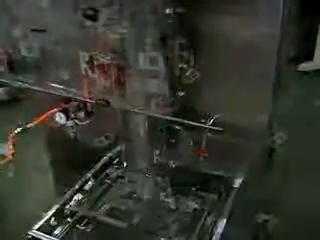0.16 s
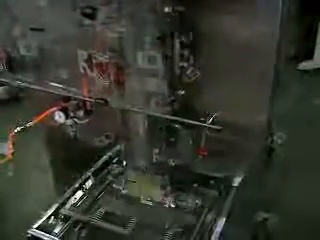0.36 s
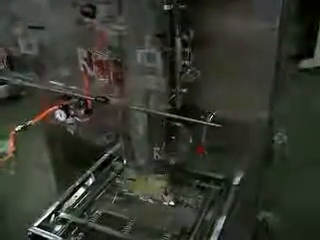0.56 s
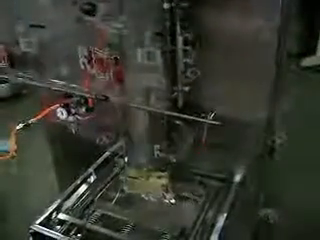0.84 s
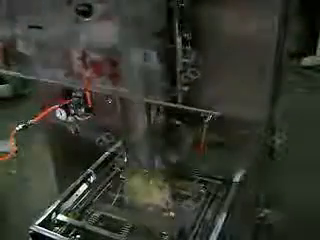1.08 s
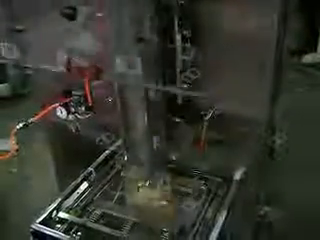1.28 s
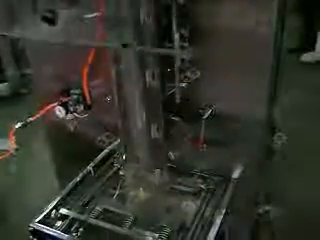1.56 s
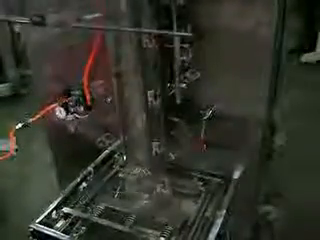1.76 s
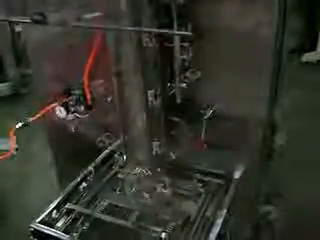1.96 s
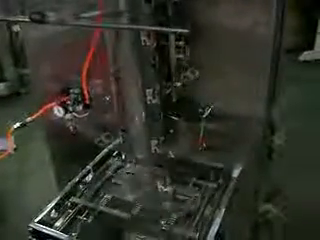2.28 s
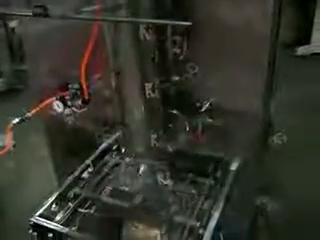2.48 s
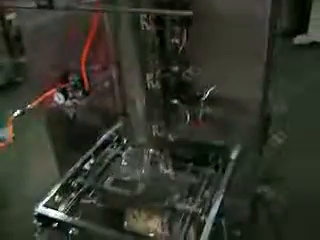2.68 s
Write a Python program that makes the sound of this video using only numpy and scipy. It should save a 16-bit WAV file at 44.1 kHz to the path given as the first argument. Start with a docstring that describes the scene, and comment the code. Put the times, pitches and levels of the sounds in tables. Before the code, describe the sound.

Close packaging machine running: whining gears, hissing bursts of compressed air, clacking valves, clattering steel slide

```python
"""The drive motor of a packaging machine whines over gear noise, in a workshop, microphone close by.
Air escapes in two bursts of filtered noise; valves and stops knock as short dying noise bursts.
For one stroke a carriage slides and rattles along its guides: random hits ring the steel frame's modes.
Mains hum and a feed motor add wavering sines. The dull microphone overloads, clipping the peaks."""
import sys
import numpy as np
from scipy import signal
from scipy.io import wavfile

SR = 44100
rng = np.random.default_rng(int(sys.argv[2]) if len(sys.argv) > 2 else 0)


def persist_wave(psi):
    """Save psi, clipped to +-1, as 16-bit WAV."""
    counts = np.round(np.clip(psi, -1, 1) * 32767).astype(np.int16)
    wavfile.write(sys.argv[1], SR, np.atleast_2d(counts).T)


N = 124803


def amp(db):
    """dB to gain."""
    return 10 ** (np.asarray(db) / 20)


def unit(x):
    """Scale to rms 1."""
    return x / np.sqrt(np.mean(x ** 2) + 1e-20)


def curve(s, values):
    """Straight lines between points in time, one value per sample."""
    return np.interp(np.arange(N) / SR, s, values)


def level(rows):
    """Gain along a (seconds, dB) curve."""
    s, db = np.transpose(rows)
    return amp(curve(s, db))


def drift(rate_hz):
    """Slow random wandering of rms 1: low-passed noise made at every 40th sample."""
    step = 40
    r = np.exp(-2 * np.pi * rate_hz * step / SR)
    noise = rng.standard_normal(N // step + 2002)
    slow = signal.lfilter([1], [1, -2 * r, r * r], noise)[2000:]  # drop the filter's start
    return np.interp(np.arange(N) / step, np.arange(len(slow)), unit(slow))


def resonance(x, hz, width_hz):
    """Two-pole resonance with gain 1 at its peak."""
    r = np.exp(-np.pi * width_hz / SR)
    feedback = [1, -2 * r * np.cos(2 * np.pi * hz / SR), r * r]
    return signal.lfilter(np.array([1, 0, -1]) * (1 - r * r) / 2, feedback, x)


def coloured(spectrum, patchy_db, rate_hz):
    """Third-octave noise bands that flicker partly together; rms 1."""
    together = drift(rate_hz)
    edges = 22 * 2 ** np.arange(0, 8.7, 1 / 3)
    white = rng.standard_normal((2, N))  # neighbouring bands take different noise
    hz, db_per_hz = np.transpose(spectrum)
    out = 0
    for k, (low, high) in enumerate(zip(edges, edges[1:])):
        db = np.interp(np.log(low * high) / 2, np.log(hz), db_per_hz)
        bandpass = signal.butter(2, [low, high], "band", fs=SR, output="sos")
        band = signal.sosfilt(bandpass, white[k % 2])
        flicker_db = patchy_db * (together + 2.5 * drift(rate_hz))
        out = out + band * amp(db + flicker_db)
    return unit(out)


def whistles(peaks):
    """Noise passed twice through each resonance."""
    out = 0
    for hz, width_hz, db in peaks:
        once = resonance(rng.standard_normal(N), hz, width_hz)
        out = out + amp(db) * unit(resonance(once, hz, width_hz))
    return out


def moving_whistle(rows, width_hz):
    """A band of noise whose centre follows a (seconds, Hz, dB) curve: slow noise on two carriers."""
    s, hz, db = np.transpose(rows)
    phase = 2 * np.pi * np.cumsum(curve(s, hz)) / SR
    lowpass = signal.butter(2, width_hz / 2, fs=SR, output="sos")
    a, b = signal.sosfilt(lowpass, rng.standard_normal((2, N)))
    return amp(curve(s, db)) * unit(a * np.cos(phase) + b * np.sin(phase))


def tone(hz, wobble_hz, flutter_db):
    """A sine of about rms 1, wavering in pitch and level."""
    flutter = amp(flutter_db * drift(20))
    pitch = hz + wobble_hz * drift(4.9)
    return np.sqrt(2) * flutter * np.sin(2 * np.pi * np.cumsum(pitch) / SR)


def gliding(rows, wobble_hz, flutter_db):
    """A tone along a (seconds, Hz, dB) curve."""
    s, hz, db = np.transpose(rows)
    return amp(curve(s, db)) * tone(curve(s, hz), wobble_hz, flutter_db)


# The drive motor's whine. Each row: time in seconds, pitch in Hz, level in dB.
DRIVE_WHINE = [(0, 935, -17), (.15, 937, -31), (.55, 942, -24.5), (.85, 944, -24), (1.0, 945, -29),
               (1.77, 945.5, -25), (1.89, 937.5, -22.5), (2.36, 940.5, -23), (2.6, 950, -31.5),
               (2.68, 938, -27), (2.74, 936, -23), (2.83, 923, -38)]


def drive_whine():
    """The turning motor gives one tone whose pitch and level follow the table, with random waver."""
    return gliding(DRIVE_WHINE, wobble_hz=3.0, flutter_db=3.5)


def chatter():
    """Gear teeth meeting unevenly: random contacts lift the gear noise in short dying bumps."""
    contacts_per_s, decay_s, depth = 200, .003, .45
    hits = (rng.random(N) < contacts_per_s / SR) * rng.random(N) * 2
    bumps = signal.lfilter([1], [1, -np.exp(-1 / (decay_s * SR))], hits)
    return unit(1 + depth * bumps)


# Strength of the gear and motor noise. Each row: time in seconds, level in dB.
GEAR_LEVEL = [(0, -13.5), (.28, -16.5), (.5, -14), (.7, -16), (.76, -17), (1.0, -17.5), (1.8, -14.5),
              (1.95, -16.5), (2.1, -16), (2.3, -15), (2.5, -12), (2.58, -17), (2.67, -20), (2.73, -15),
              (2.83, -17)]
# Colour of that noise. Each row: frequency in Hz, relative density in dB per Hz.
GEAR_COLOUR = [(25, -16), (70, -19), (120, -12), (270, -10.5), (340, -13.5), (500, -12), (640, -7),
               (950, 0.5), (1200, -3.5), (1550, -8), (2500, -12), (4700, -18), (5500, -24.5), (6500, -12.5),
               (8000, -34)]
# Casing resonances. Each row: frequency in Hz, width in Hz, level in dB relative to the coloured noise.
CASING_MODES = [(266.7, 65, -17.5), (421.8, 25, -17.5), (830.7, 22, -16.5), (175.5, 38, -22.5),
                (1153.5, 33, -12.5), (1673, 13, -20)]


def gear_noise():
    """Uneven tooth contact shakes the casing: broad noise and its resonances, chattering together."""
    noise = coloured(GEAR_COLOUR, patchy_db=.6, rate_hz=25) + whistles(CASING_MODES)
    return level(GEAR_LEVEL) * chatter() * noise


# The casing's boom coming and going with the load. Each row: time in seconds, level in dB.
CASING_BOOM = [(0, -18.5), (.25, -29.5), (.36, -47), (.48, -31), (.55, -19.5), (.72, -28), (.8, -29),
               (.9, -33), (1.0, -26.5)]


def casing_boom():
    """A broad casing resonance turns noise into a hollow boom."""
    boom_hz, width_hz = 638.4, 132
    return level(CASING_BOOM) * whistles([(boom_hz, width_hz, 0)])


# Mains hum. Each row: frequency in Hz, level in dB rms, pitch wobble in Hz.
MAINS_HUM = [(102.2, -41, 0.99)]


def mains_hum():
    """A faint, low, slightly wavering sine."""
    return sum(amp(db) * tone(hz, wobble_hz, flutter_db=0.5) for hz, db, wobble_hz in MAINS_HUM)


# The exhaust dying away. Each row: time in seconds, level in dB.
EXHAUST_LEVEL = [(0, -14), (.05, -7), (.09, -11), (.135, -7.5), (.19, -11), (.3, -13.5), (.43, -15),
                 (.47, -13.5), (.55, -17), (.6, -16), (.73, -20), (.74, -58)]
# Colour of the exhaust. Each row: frequency in Hz, relative density in dB per Hz.
EXHAUST_COLOUR = [(25, -5.5), (400, -13), (700, -21), (1300, -4), (2500, 1), (4200, -4.5), (5300, -6.5),
                  (6400, -1), (8000, -20)]
# Thin whistle as the exhaust opens. Each row: time in seconds, pitch in Hz, level in dB.
OPENING_WHISTLE = [(.01, 1352, -35), (.035, 1340, -15), (.12, 1357, -25), (.17, 1390, -56.5)]


def exhaust():
    """Turbulent escaping air: broad noise that pulses and fades, with a thin whistle at its start."""
    jet = level(EXHAUST_LEVEL) * coloured(EXHAUST_COLOUR, patchy_db=.5, rate_hz=30)
    return jet + moving_whistle(OPENING_WHISTLE, width_hz=30)


# Knocks of valves and stops. Each row: start in seconds, level in dB, ring in Hz,
# time to fall by 60 dB in seconds.
VALVE_KNOCKS = [(0.372, -7, 2360, 0.082), (.455, -14.5, 4400, 0.13), (0.488, -8.5, 4680, 0.1),
                (0.57, -5, 2780, 0.039), (1.013, -11.5, 900, 0.34), (1.191, -2.5, 2820, 0.087),
                (1.793, -8.5, 2320, 0.092), (2.682, -13, 3500, 0.083), (2.694, -15, 2498, 0.064),
                (2.779, -25, 1800, 0.014)]


def knocks():
    """Each impact is a broad dying noise burst with a ring of its own pitch."""
    ring_db, ring_width_hz, bass_cut_hz, top_cut_hz = -6, 700, 400, 6000
    bandpass = signal.butter(2, [bass_cut_hz, top_cut_hz], "band", fs=SR, output="sos")
    t, out = np.arange(N) / SR, 0
    for s, db, hz, t60 in VALVE_KNOCKS:
        noise = rng.standard_normal(N)
        broad = unit(signal.sosfilt(bandpass, noise))
        ring = unit(resonance(noise, hz, ring_width_hz))
        body = unit(broad + amp(ring_db) * ring)
        age = np.maximum(t - s, 0)
        attack = np.minimum(age / .001, 1)  # silent before the start, full after 1 ms
        out = out + amp(db - 60 * age / t60) * attack * body
    return out


# Feed motor tone, dragged down under the stroke. Each row: time in seconds, pitch in Hz, level in dB.
FEED_MOTOR = [(1.01, 411, -58), (1.14, 414.7, -14.5), (1.251, 412, -32), (1.349, 411.7, -19.5),
              (1.78, 410.6, -20.5), (1.88, 422.8, -31.5), (2.25, 425, -26.5), (2.299, 424, -33)]


def feed_motor():
    """A lower motor tone whose pitch and level follow the table."""
    return gliding(FEED_MOTOR, wobble_hz=1.5, flutter_db=1.0)


# Frame ringing under the carriage stroke. Each row: time in seconds, level in dB.
RING_LEVEL = [(1.010, -21.5), (1.0145, -6.5), (1.04, -1), (1.07, -10), (1.1, -15.5), (1.15, -9.5),
              (1.21, -17.5), (1.25, -11), (1.34, -13), (1.42, -7.5), (1.6, -11.5), (1.66, -10), (1.78, -11),
              (1.82, -15), (1.87, -18), (1.94, -30), (2.0, -50)]
# Modes of the steel frame. Each row: frequency in Hz, relative level in dB,
# time to fall by 60 dB in seconds.
FRAME_MODES = [(327, -7, .18), (356, -9, .3), (500, -3, .08), (530, -1, .1), (560, -3, .1), (590, -2, .1),
               (620, -2, .1), (712, -7, .2), (810, -6, .06), (915, -4, .1), (969, -3, .25), (1020, -8, .15),
               (1115, -5, .15), (1299, -6, .1), (1400, -8, .2), (1425, -7, .2)]
# Extra ringing of the lowest modes, growing until 1.18 s, then fading.
# Each row: time in seconds, boost in dB before the ringing is scaled as a whole.
LOW_MODE_BOOST = [(1.0, 2), (1.18, 6.5), (1.25, 1.5), (1.6, 0)]


def frame_ringing():
    """Dense uneven rattles of the carriage strike the frame, and each mode rings and decays."""
    rattles_per_s, spread_db, low_under_hz = 1100, 3.5, 450
    rate = rattles_per_s * amp(1.5 * drift(20))
    hits = (rng.random(N) < rate / SR) * rng.choice([-1, 1], N)
    hits = hits * amp(spread_db * np.minimum(rng.exponential(1, N), 5))
    boost = level(LOW_MODE_BOOST)
    rings = 0
    for hz, db, t60 in FRAME_MODES:
        width_hz = np.log(1000) / np.pi / t60
        strikes = hits * rng.standard_normal(N) + 1e-18  # each mode takes every hit differently
        ring = unit(resonance(strikes, hz, width_hz))
        rings = rings + amp(db) * (boost if hz < low_under_hz else 1) * ring
    return level(RING_LEVEL) * unit(rings)


# Sliding noise along the guides. Each row: time in seconds, level in dB.
SLIDING_LEVEL = [(1.010, -30), (1.0145, -11), (1.1, -10.5), (1.24, -12), (1.35, -12.5), (1.44, -12.5),
                 (1.6, -13), (1.79, -12), (1.83, -16.5), (1.92, -32), (1.97, -37)]
# Colour of the sliding. Each row: frequency in Hz, relative density in dB per Hz.
SLIDING_COLOUR = [(25, -16.5), (270, -12), (330, -19), (450, -13), (600, -8.5), (800, -6.5), (1300, -5.5),
                  (1600, -20.5), (2250, -6.5), (3000, -13.5), (3700, -13.5), (4500, -16.5), (5400, -21),
                  (6400, -14), (8000, -47.5)]
# Guide resonances. Each row: frequency in Hz, width in Hz, level in dB relative to the coloured noise.
GUIDE_MODES = [(2180, 510, -14.5), (3645, 430, -11)]


def carriage_sliding():
    """Friction along the guides: flickering broad noise with two wide resonances."""
    friction = coloured(SLIDING_COLOUR, patchy_db=.5, rate_hz=12) + whistles(GUIDE_MODES)
    return level(SLIDING_LEVEL) * unit(friction)


# The short hard burst of air. Each row: time in seconds, level in dB.
BURST_LEVEL = [(2.306, -52), (2.312, -14), (2.34, -9), (2.38, -8), (2.44, -6.5), (2.5, -6), (2.525, -7.5),
               (2.545, -15.5), (2.6, -23), (2.66, -27.5)]
# Colour of the burst. Each row: frequency in Hz, relative density in dB per Hz.
BURST_SPECTRUM = [(25, -14.5), (450, -13), (1100, -10.5), (1600, -8.5), (2400, -3.5), (3000, -7),
                  (4000, -7), (5200, -10.5), (6400, -3.5), (8000, -30)]
# Upper nozzle whistle. Each row: frequency in Hz, width in Hz, level in dB relative to the coloured noise.
UPPER_WHISTLE = [(4160, 440, -12)]
# Lower nozzle whistle, higher at the end, with a dip on the way, as the pressure builds.
# Each row: time in seconds, pitch in Hz, level in dB relative to the coloured noise.
LOWER_WHISTLE = [(2.31, 2000, -12), (2.38, 2277, -14.5), (2.43, 2042, -11.5), (2.52, 2590, -12)]


def air_burst():
    """Air forced through a nozzle: broad noise with one fixed and one moving resonance."""
    jet = coloured(BURST_SPECTRUM, patchy_db=-0.5, rate_hz=50)
    jet = jet + whistles(UPPER_WHISTLE) + moving_whistle(LOWER_WHISTLE, width_hz=200)
    return level(BURST_LEVEL) * unit(jet)


def scene():
    """All sources summed to one channel."""
    machine = drive_whine() + gear_noise() + casing_boom() + mains_hum() + feed_motor()
    carriage = frame_ringing() + carriage_sliding()
    air = exhaust() + air_burst()
    return (machine + air + knocks() + carriage)[None, :]


def record(dry):
    """A dull microphone, hard overload, faint circuit hiss, then a steep top cut."""
    mic_stop_hz, overload, hiss_db, top_stop_hz = 6312 * 1.193, 1, -92, 15800
    microphone = signal.cheby2(10, 75, mic_stop_hz, fs=SR, output="sos")  # 75 dB down from there up
    dull = signal.sosfilt(microphone, dry)
    loud = np.clip(dull, -overload, overload) + amp(hiss_db) * rng.standard_normal(N)
    top_cut = signal.cheby2(24, 45, top_stop_hz, fs=SR, output="sos")
    return signal.sosfilt(top_cut, loud)


dry = scene()
out = record(dry)
persist_wave(out)
```